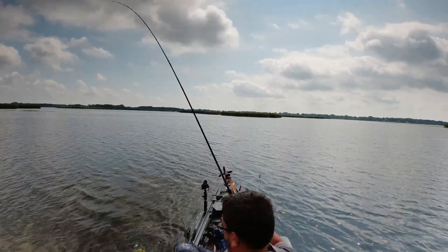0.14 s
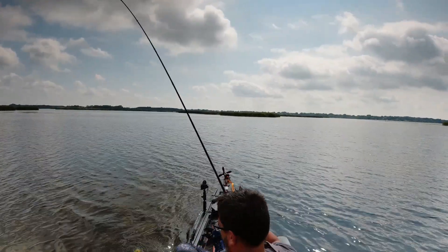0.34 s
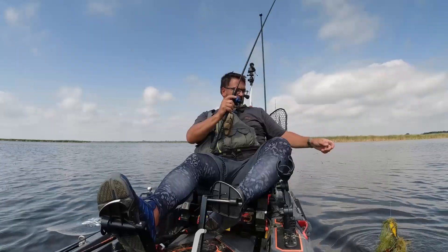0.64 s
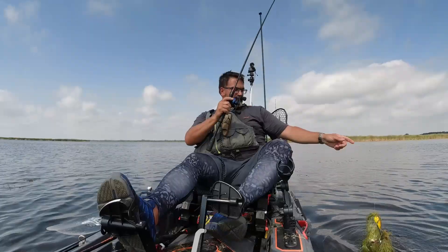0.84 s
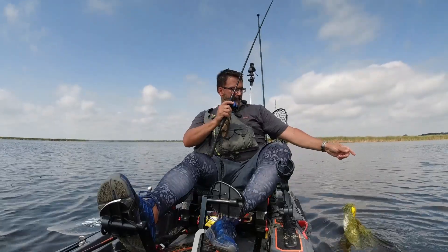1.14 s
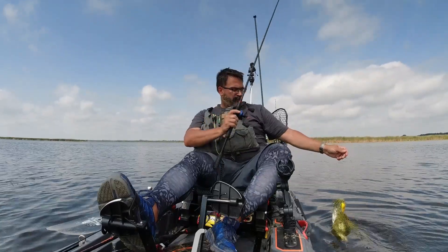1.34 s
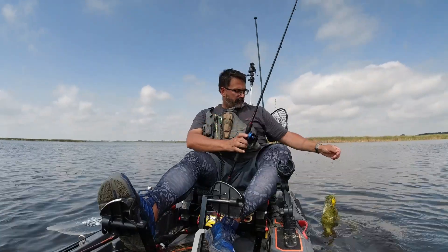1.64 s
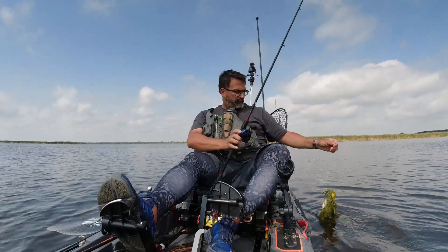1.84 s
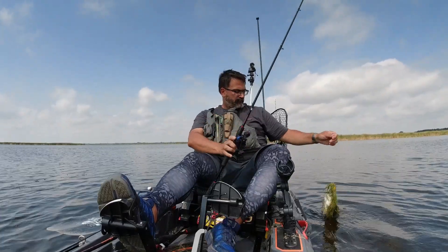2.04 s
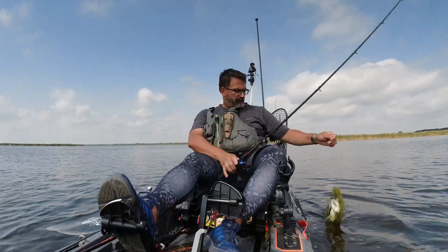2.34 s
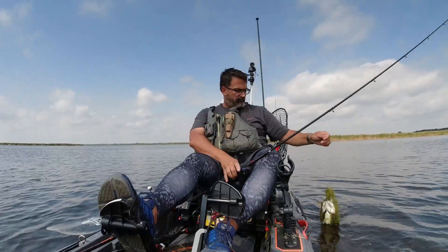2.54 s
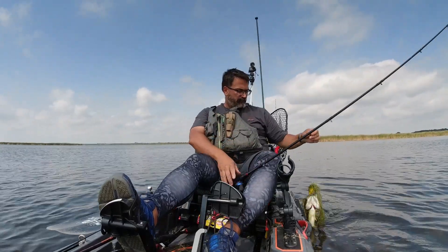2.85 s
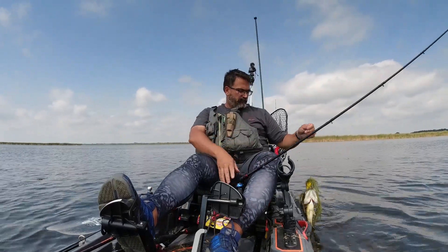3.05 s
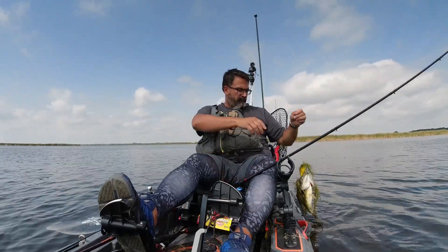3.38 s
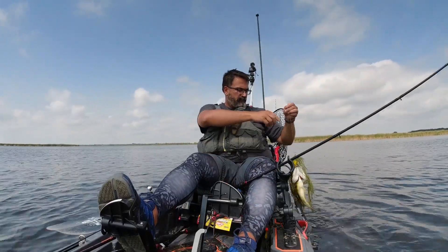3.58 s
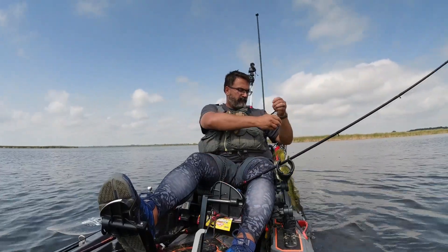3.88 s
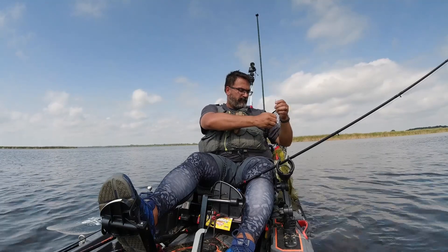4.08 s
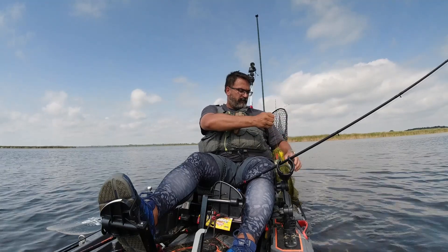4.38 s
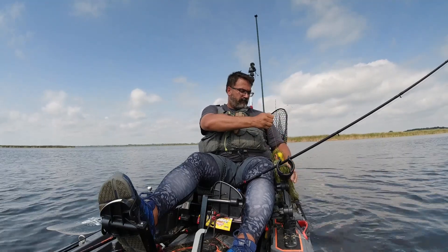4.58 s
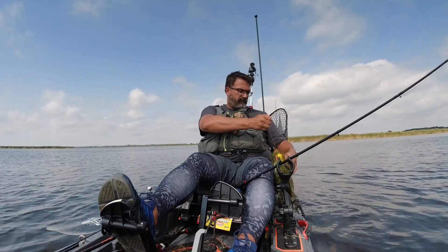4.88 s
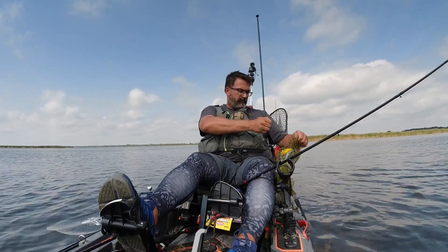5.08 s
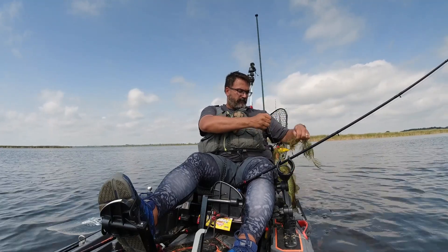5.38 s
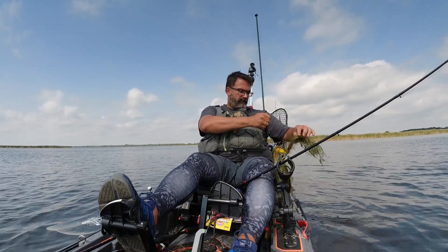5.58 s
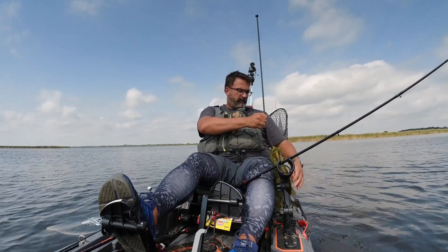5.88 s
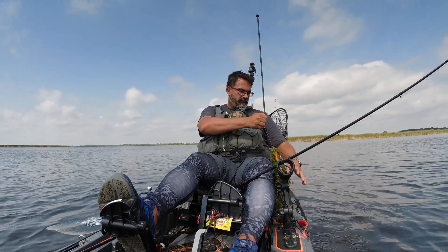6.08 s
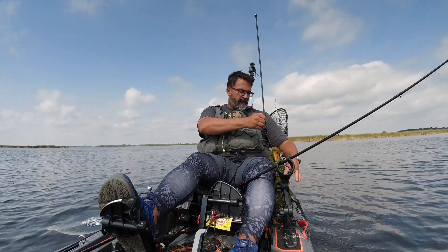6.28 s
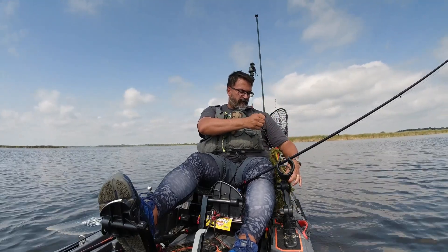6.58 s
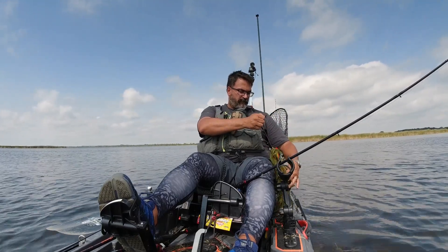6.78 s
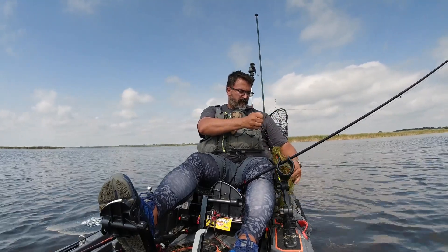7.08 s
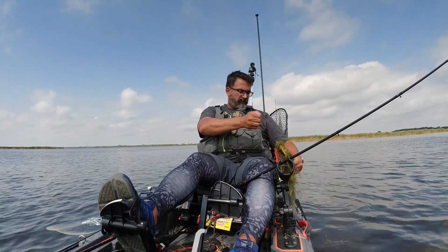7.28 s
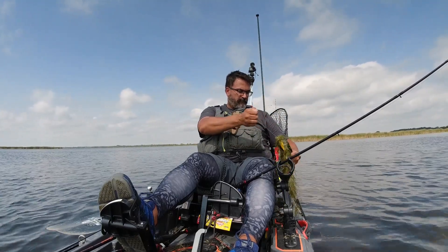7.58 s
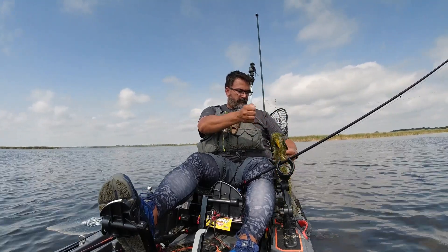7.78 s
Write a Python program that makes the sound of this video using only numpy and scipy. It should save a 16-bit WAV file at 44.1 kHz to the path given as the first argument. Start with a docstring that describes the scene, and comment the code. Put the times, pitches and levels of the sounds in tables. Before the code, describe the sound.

Feet and gear bump a hollow plastic kayak with dull, boomy knocks, while water gulps and wet rubber squeaks briefly. A very sharp plastic clack stands out early. More knocks, taps and cloth rustle follow, then the hull calms and crisp reel clicks come in small clusters. Close microphone mounted on the boat, outdoors on quiet open water, dry, with faint breeze and low hull drone.

```python
"""Hollow knocks come first: feet and rod strike a plastic kayak as an angler lifts a weedy fish.
The hull is a drum with ringing walls; tackle clacks and taps are short damped modes and noise bursts.
The reel ticks as its pawl snaps over teeth; clothing scuffs and sliding gear are modulated coloured noise.
Water gulps, drips and spits as short tones, with squeaks gliding in pitch.
The rocking boat shakes the mount in low swings, over a quiet lake breeze and a droning hull."""
import sys
import numpy as np
from scipy.fft import rfft, irfft, next_fast_len
from scipy.io import wavfile
from scipy.ndimage import map_coordinates

SR = 44100
rng = np.random.default_rng(int(sys.argv[2]) if len(sys.argv) > 2 else 0)


def wrap_up_sound(samples):
    """Save the sound to the file named by the first command line argument, as 16-bit audio."""
    columns = np.atleast_2d(samples).T
    # keep every value between -1 and 1, then stretch to whole-number steps
    tamed = np.clip(columns, -1, 1)
    steps = np.round(tamed * 32767).astype(np.int16)
    wavfile.write(sys.argv[1], SR, steps)


N = 349700
CLOCK = np.arange(N) / SR  # scene time, s
AGE = np.arange(SR // 2) / SR  # time since a blow, s
TOP_HZ = 16500  # band limit

# Light air over open water: pitch_hz, density_db (per Hz)
BREEZE_SPECTRUM = [(18, -38.5), (30, -7), (157, 9.5), (426, -12.5), (600, -22.5), (2980, -23.5),
                   (3980, -40), (6550, -51), (7270, -65), (9220, -52.5), (16000, -56)]
# Low swell beneath the air: pitch_hz, density_db (per Hz)
SWELL_SPECTRUM = [(10, -2.0), (28, 4.0), (45, -17.0), (90, -38.5), (300, -83.5)]
# Drone of the hollow hull: pitch_hz, density_db (per Hz)
DRONE_SPECTRUM = [(24, -39.5), (40, -1), (113, 4), (179, 1), (317, -10.5), (357, -9.5), (401, -17.5),
                  (750, -23), (900, -30.5), (1170, -51.5), (1980, -120)]

# The boat rocks, or lurches when a blow shoves it, and shakes the mount: middle_s, level_db, pitch_hz,
# half_length_s
LURCHES = [(0.157, -27, 17, 0.042), (0.235, -25, 40.7, 0.065), (0.448, -19.5, 9.1, 0.0073),
           (0.665, -31, 16.2, 0.12), (1.134, -37, 10.8, 0.066), (1.919, -33.5, 20, 0.11),
           (2.679, -31, 51, 0.11), (3.959, -24, 16, 0.026), (5.833, -36.5, 41, 0.032),
           (6.458, -27.5, 15.4, 0.025), (6.972, -18.5, 14.6, 0.036), (7.059, -25, 20.8, 0.093),
           (7.533, -20.5, 12.9, 0.031)]

# The angler shifts in the seat: start_s, end_s, rustle_db
SHIFTS = [(0, 0.17, -66.5), (0.694, 1.076, -64), (1.28, 1.916, -66.5), (2.351, 2.833, -59.5),
          (2.982, 3.723, -59)]
# Rustle of clothes: pitch_hz, density_db (per Hz)
CLOTH_SPECTRUM = [(150, 1.5), (350, 6), (700, 3.5), (1200, -1), (2700, -7.5), (4000, -13.5), (9500, -17),
                  (15000, -30)]
STILL_DB, SHIFT_RAMP_S = -67.5, 0.036  # rustle while still; time for a shift to start or stop
CRINKLE_DB, CRINKLES_PER_S = 4.5, 340  # grain of the cloth
FOLD_DB, FOLDS_PER_S = 2.5, 35  # unevenness from fold to fold
RUSTLE_SWAY_DB, SWAYS_PER_S = 1, 13  # slower sway of the rustle

# Shoes, sleeves and line slide over gear, and water along the hull:
# middle_s, length_s, level_db, centre_hz, width_octaves
RUBS = [(0.42, 0.082, -39, 388, 0.94), (0.539, 0.14, -50.5, 450, 1.28), (0.545, 0.26, -56, 5800, 1.2),
        (0.51, 0.11, -51.5, 5450, 0.28), (0.519, 0.11, -62, 4060, 0.078), (0.53, 0.11, -56.5, 12100, 0.26),
        (0.586, 0.05, -48, 6320, 0.63), (0.588, 0.054, -44.5, 466, 1.03), (0.676, 0.085, -47, 355, .6),
        (0.682, 0.16, -60, 9500, 6.9), (0.781, 0.029, -43.5, 794, 0.44), (0.921, 0.21, -69.5, 1200, 1.6),
        (1.225, 0.17, -57, 11500, 0.28), (1.227, 0.14, -61.5, 6500, 3.4), (1.941, 0.25, -43.5, 273, 1.26),
        (1.927, 0.13, -48, 1090, 0.2), (1.966, 0.2, -56, 2780, 0.17), (1.916, 0.22, -65, 5900, 0.64),
        (2.54, 0.25, -53.5, 550, 0.95), (3.53, 0.17, -50, 500, 0.7), (3.537, 0.11, -68.5, 1900, 0.56),
        (4.953, 0.22, -60.5, 11750, 2), (5.298, 0.34, -72.5, 9700, .3), (5.813, 0.11, -55, 12000, 2),
        (7.051, 0.21, -57, 333, 0.99), (7.334, .08, -61, 783, 0.64), (7.491, 0.39, -57.5, 341, 1.02),
        (7.525, 0.085, -69.5, 2500, 1.7)]
# Resonances of rod and reel: centre_hz, width_hz, level_db
GEAR_RESONANCES = [(1260, 39, -10.5), (2110, 200, 13), (2620, 200, 0.5), (3700, 890, 2.5),
                   (5240, 680, -8.5), (8090, 290, -7.5), (10500, 1900, -9)]
STROKE_PEAK = 0.67  # share of a stroke spent growing
SLIP_DB, SLIPS_PER_S = 1.5, 200  # coarse catches of the surfaces
GRIT_DB, GRITS_PER_S = 3.5, 900  # fine grit

# Wet rubber squeaks, mostly upward: start_s, length_s, level_db, from_hz, to_hz
SQUEAKS = [(0.464, 0.024, -42.5, 683, 1410), (0.485, 0.024, -41, 1175, 1110),
           (0.502, 0.027, -47, 1060, 1360), (0.485, 0.025, -51, 1460, 1720),
           (0.537, 0.0133, -50, 1460, 2380), (0.571, 0.013, -43, 870, 2080)]
SQUEAK_ROUGH = 0.07  # share by which the pitch wavers

# Wet grit and droplets spit: start_s, length_s, rms_db, centre_hz, scatter_octaves (half the extreme)
SPATTERS = [(0.473, 0.11, -58.5, 5180, 0.47), (0.569, 0.036, -55.5, 6500, 0.68),
            (.635, .11, -72.5, 8940, 0.22), (1.17, .12, -65.5, 10600, 0.23), (1.881, .17, -57, 1400, .5),
            (1.896, 0.069, -55, 2850, 0.51), (5.791, 0.042, -58, 8000, 0.71)]
SPITS_PER_S, SPIT_CYCLES, SPIT_SCATTER_DB = 370, 13, 5  # cycles until one has died; spread of strength

# Drops and small laps trap a bubble: start_s, level_db, bubble_hz, t60_s
DROPS = [(.247, -34.5, 2260, 0.037), (4.31, -39.5, 680, 0.017), (4.5489, -39, 657, 0.024),
         (4.655, -51, 680, .025), (6.266, -47.5, 660, 0.017)]
# Water under the hull squeezes an air pocket:
# start_s, peak_db, pitch_hz, glide_octaves_per_s, t60_s
GULPS = [(.111, -27, 534, -4.5, 0.18), (.115, -29, 289, 7, 0.055), (.181, -23, 331, 0.5, 0.066),
         (1.818, -33, 1266, -5.5, 0.031), (1.857, -45, 785, 0, 0.024), (1.971, -34.5, 810, 1.5, 0.062),
         (2.223, -41, 770, 3, 0.12), (2.812, -27, 357, 4.5, 0.16), (2.829, -38, 975, -3, 0.058),
         (3.466, -40, 835, -4.5, 0.14), (3.478, -43.5, 601, 6.5, 0.19), (5.803, -32.5, 779, 1, 0.052),
         (5.804, -36.5, 316, 4, 0.061)]
GULP_ATTACK_S, GULP_ROUGH = 0.0023, 0.13  # time to swell; share by which the pitch wavers

# The reel clicks as the rod moves or line is tugged: start_s, level_db, strongest_hz
TICKS = [(0.2263, -53.5, 6200), (0.3009, -52, 5830), (0.4224, -43, 6700), (0.436, -44.5, 7300),
         (0.5781, -32.5, 6530), (0.587, -41, 5620), (.596, -34.5, 7460), (0.608, -34, 8980),
         (0.6608, -45, 9100), (.6738, -39.5, 9690), (1.259, -51, 11700), (1.865, -48.5, 7200),
         (2.4082, -46.5, 10200), (2.608, -49.5, 5400), (2.662, -52.5, 6300), (3.189, -35.5, 5830),
         (3.331, -54.5, 7600), (3.4653, -27.5, 8540), (3.652, -44.5, 10500), (3.9218, -33.5, 6040),
         (4.153, -35, 8900), (4.3202, -42, 4960), (4.56, -43.5, 4760), (4.928, -25.5, 6900),
         (4.932, -33, 9500), (4.9435, -32.5, 9800), (4.95, -34.5, 8500), (4.963, -31.5, 8000),
         (4.9716, -22, 8100), (4.9865, -41, 8850), (4.993, -35, 10260), (5.0134, -40.5, 7000),
         (5.0303, -22.5, 7400), (5.2518, -34.5, 7180), (5.255, -38.5, 8500), (5.4676, -28.5, 6500),
         (5.6302, -34, 6950), (5.638, -40.5, 8020), (5.646, -31.5, 6460), (5.6762, -35.5, 5880),
         (5.687, -39, 5970), (5.8322, -29.5, 11190), (5.852, -55, 11000), (6.6361, -50, 5030),
         (7.519, -53, 6130), (7.8818, -45, 5970)]
# The spool slips and the pawl chatters: start_s, length_s, first_level_db, strongest_hz, fade_db (over the run)
RUNS = [(1.572, 0.055, -43, 9200, 16), (3.196, 0.13, -49, 9100, 22), (3.937, 0.12, -55, 9300, 7),
        (4.338, 0.077, -48.5, 6200, 18), (4.603, 0.018, -51.5, 5000, 2), (4.888, 0.03, -45.5, 11700, 9.5),
        (4.997, 0.032, -53, 11000, 1), (5.109, 0.027, -50, 5460, 13), (5.256, 0.11, -51, 8500, 12),
        (5.66, 0.011, -42, 6670, 3), (5.695, 0.02, -42, 5800, 12), (7.7078, 0.052, -43.5, 5700, 12.5),
        (7.8995, 0.03, -40.5, 5900, 3)]
# Modes of the pawl spring: pitch_hz, level_db, t60_s
PAWL_MODES = [(3347, -28, 0.00632), (5240, -4.5, 0.007), (5540, 1.5, 0.022), (6586, -13, 0.0045),
              (7800, -1, 0.021), (7610, -4, 0.0081), (8940, -13, 0.004), (10100, -1, 0.018),
              (10600, -11, 0.0069), (13100, -22, 0.0035)]
# Top octave of a click, and its housing: pitch_hz, density_db (per Hz)
PAWL_SNAP_SPECTRUM = [(6000, -23.5), (11000, -2.5), (13000, -6), (15500, -17.5), (17000, -40)]
HOUSING_SPECTRUM = [(500, 1.5), (2500, 6), (4400, 6.0), (5700, 6), (6700, 9.0), (8000, 4.0),
                    (10500, 2.5), (13000, -19.0)]
PAWL_PER_S, PAWL_JITTER, PAWL_SCATTER_DB = 190, 0.19, 3  # click rate; scatter of spacing (share) and level
PAWL_DETUNE, PAWL_TAIL_DB = 0.045, -12  # pitch scatter (share); ring left after the first snap
SNAP_DB, SNAP_HZ, SNAP_DB_PER_OCTAVE = -38.5, 5660, 42  # base of the snap level, its pitch, growth above it

# Rod and tackle tap against the boat: start_s, level_db, ring_hz, deck_db (re the tap)
TAPS = [(0.0796, -38.5, 1780, -10), (0.104, -33, 3480, -26), (.111, -28, 1540, -21), (.186, -31, 2500, -16),
        (.3872, -41, 1900, -10), (.4716, -37, 2730, -22), (1.701, -25.5, 2970, -26),
        (1.7815, -35.5, 2700, -18.5), (1.914, -47, 2060, -16), (1.931, -33.5, 2530, -11),
        (1.943, -41, 2880, -14), (2.0677, -38.5, 1750, -20), (2.1277, -24.5, 2050, -31.5),
        (2.4082, -24.5, 2230, -22.5), (2.7998, -34.5, 1600, -10), (2.8169, -26.5, 2570, -15.5),
        (3.1087, -28.5, 5140, -33), (3.464, -24, 2200, -18), (3.468, -23.5, 2500, -15.5),
        (3.708, -28.5, 2620, -20), (3.906, -26.5, 2690, -19), (4.32, -43.5, 3030, -28),
        (4.5598, -41, 3840, -21.5), (5.8025, -35.5, 4070, -16), (5.8327, -25.5, 2090, -18.5)]
# Crack, bright edge and deck answer of a tap: pitch_hz, density_db (per Hz)
TAP_CRACK_SPECTRUM = [(300, -6), (700, 6.5), (1400, -15), (2200, 4.5), (4500, 0), (6200, -16.5),
                      (10000, -87), (16000, -44)]
TAP_EDGE_SPECTRUM = [(3000, -27), (6500, 18), (10500, 5), (15000, -15.5)]
TAP_DECK_SPECTRUM = [(250, 11.0), (700, 5.5), (2500, -3.0), (5000, -10.5), (10000, -19.5), (14000, -38)]
TAP_EDGE_DB = -21.5  # re the tap

# A hard plastic fitting snaps: start_s, level_db
CLACKS = [(0.542, -33.5), (0.578, -36.5), (0.6273, -10.5), (0.6353, -34), (0.7334, -31.5), (0.8536, -43.5),
          (1.01, -52), (1.3344, -48), (3.6527, -33), (3.6623, -35.5), (5.6053, -36.5), (5.612, -42.5)]
# Modes of the fitting: pitch_hz, level_db, t60_s
FITTING_MODES = [(1170, -22, 0.021), (1807, 3, 0.011), (2100, -4.5, 0.01), (2306, -15, .02),
                 (2660, -20, 0.022), (4170, -23, .009), (5300, -30.5, 0.0045), (5900, -26.5, .007)]
# Snap and deck answer of a clack: pitch_hz, density_db (per Hz)
CLACK_SNAP_SPECTRUM = [(500, -11.5), (2000, 8.5), (6000, -11.5), (11000, -6), (16000, -28)]
CLACK_DECK_SPECTRUM = [(300, -1.0), (900, 2.0), (2800, 2.5), (4000, -6.0), (12000, -24.0)]

# Feet and rod butt strike the hull, then settle: start_s, strength_db, hardness (0-1), drum_hz,
# drum_t60_s, settle_s, wall_db (re the strength), strongest_wall_hz
KNOCKS = [(0.11, -29, 0.74, 150, 0.091, 0.0091, 10, 426), (0.1799, -31, 0.73, 110.7, 0.19, .026, 11.5, 275),
          (0.24, -36.5, 0.4, 108.4, 0.62, .035, -15, 190),
          (0.3858, -36.5, 0.97, 90.3, 0.37, .01, 14.5, 425),
          (0.45, -37.5, 0.88, 118.7, 0.47, 0.022, 7, 830), (.646, -32, 0.48, 112.6, 0.5, .03, 1, 252),
          (0.95, -44, 0.5, 119.3, 0.28, .019, -19, 190),
          (1.8169, -32, 0.73, 122.4, 0.26, 0.0091, 13.5, 247),
          (1.8567, -33.5, 0.66, 120, 0.29, 0.012, 7, 475), (1.931, -44, 0.4, 119.6, 0.18, 0.01, 12, 680),
          (1.9701, -32, 0.5, 117, 0.22, 0.0054, 10.5, 250), (2.021, -34.5, 0.64, 122, 0.64, 0.02, 11, 215),
          (2.057, -42, 0.79, 121, 0.18, 0.016, 7.5, 210), (2.129, -44, 0.88, 128.5, 0.43, 0.013, 9, 564),
          (2.2221, -23, 0.48, 115.7, 0.21, 0.042, -3.5, 216), (2.37, -37, 0.1, 135.4, 0.6, .019, 1.5, 220),
          (2.593, -28, 0.5, 110.5, 0.1, 0.028, -10.5, 200), (2.667, -46, 0.76, 110, 0.25, 0.022, 4, 503),
          (2.8114, -25.5, 0.65, 147, 0.078, 0.0065, 7.5, 230),
          (2.879, -32.5, 0.4, 122, 0.24, 0.0168, -8, 190), (3.185, -49, 0.8, 117.5, 0.21, 0.053, 2, 345),
          (3.4658, -51, 1, 119.7, 0.63, 0.0033, -6, 900), (3.468, -29.5, 0.1, 101.7, 0.56, .043, -20, 190),
          (3.492, -27.5, .05, 123.2, 0.19, 0.062, -23, 190), (3.923, -37.5, 0, 150.8, 0.22, .02, -4.5, 190),
          (5.602, -54, 1, 118, 0.1, 0.0067, 14.5, 1100),
          (5.8026, -46, 0.95, 113.5, 0.19, 0.0074, 12.5, 435)]
# Drum modes of the hull: pitch_ratio, level_db, t60_share (of the drum's)
HULL_MODES = [(.81, -7.5, 0.3), (1, 10.5, 1), (1.35, -3, 0.89), (1.73, -13, 0.92)]
# Modes of the hull walls: pitch_hz, level_db, t60_s
WALL_MODES = [(169, -4.5, 0.51), (201.1, 10.5, 0.1), (253, -5.5, 0.41), (299, -2.5, 0.2), (340, -6, 0.29),
              (386.4, 2.5, 0.14), (434, -4, 0.11), (498, 2.5, 0.068), (598, -5, .07), (686, -1.5, .08),
              (820, 1.5, 0.045), (926.6, -3.5, 0.063), (1090, -13, .06), (1409, -13.5, 0.094)]
# Noise at the point of contact, and rattle of the walls: pitch_hz, density_db (per Hz)
CONTACT_SPECTRUM = [(400, -32), (800, 6), (1350, 10), (1900, -3), (3000, -7.5), (5000, -23.5),
                    (9000, -26.5), (15000, -62.5)]
RATTLE_SPECTRUM = [(120, -13.0), (250, 6.5), (520, -0.5), (900, -11.0), (2000, -35.5), (5000, -65.5)]
SETTLE_DB, SETTLE_HARDNESS = -4.5, 0.52  # settling thump re the first blow; its share of the hardness
WALL_SOFT_HZ, WALL_SETTLE_DB = 207.7, -4  # strongest wall pitch in the thump; change of wall level there
WALL_FOCUS_DB = 9  # fall per octave away from the strongest wall pitch
CONTACT_SOFT_DB, CONTACT_HARD_DB, CONTACT_TAIL_DB = -50.5, 9, -13  # re the strength; tail re the contact
SHOVE_DB, SHOVE_HZ, SHOVE_LAG_S, SHOVE_HALF_S = -9.5, 45.3, 0.059, 0.029  # each knock shoves the boat


def amp(db):
    """Level in decibels converts to a linear gain."""
    return 10 ** (np.asarray(db) / 20)


def unit(x):
    """Normalization to an rms of 1."""
    return x / np.sqrt(np.mean(x ** 2) + 1e-20)


def crest(x):
    """Normalization to a peak of 1."""
    return x / np.max(np.abs(x))


def add(track, s, sound):
    """Superposition: mix a sound into the track at time s, cropped at both ends."""
    start = round(s * SR)
    sound = sound[max(-start, 0):]
    room = track[max(start, 0):][:len(sound)]
    room += sound[:len(room)]


def noise(spectrum, size):
    """Spectral shaping: white noise is filtered through (Hz, dB) points and set to rms 1."""
    hz, db = np.transpose(spectrum)
    m = next_fast_len(size)
    log_hz = np.log(np.fft.rfftfreq(m, 1 / SR) + 1)
    gain = amp(np.interp(log_hz, np.log(hz), db))
    gain[0] = 0
    return unit(irfft(rfft(rng.standard_normal(m)) * gain, m)[:size])


def wobble(rate):
    """Slow random modulation: a smooth curve through random knots, rate of them a second."""
    return map_coordinates(rng.standard_normal(4096), [CLOCK * rate], mode="wrap")


def fade(t60):
    """Exponential damping: a fall of 60 dB in t60 seconds."""
    return np.exp(-np.log(1000) * AGE / t60)


def rise(attack):
    """Finite contact time: the force builds up exponentially."""
    return 1 - np.exp(-AGE / attack)


def ring(modes, pitch=1):
    """Modal superposition: damped sines of joint peak 1, weighed anew by each blow's place."""
    out = 0
    for k, (hz, db, t60) in enumerate(modes):
        more_db, detune = rng.normal(0, 2), rng.normal(0, 0.007)
        tone = np.sin(2 * np.pi * pitch * hz * (1 + detune) * AGE)
        out = out + (-1) ** k * amp(db + more_db) * fade(t60) * tone
    return crest(out)


def breeze():
    """Broadband turbulence: steady air and swell, while ripples keep the hollow hull droning."""
    air = amp(-62.0) * noise(BREEZE_SPECTRUM, N)
    swell = amp(-62.5) * noise(SWELL_SPECTRUM, N)
    drone = amp(-54 + 0.8 * wobble(6.8)) * noise(DRONE_SPECTRUM, N)
    return air + swell + drone


def swing(hz, half):
    """Inertia of a heavy body: a low oscillation with judder, swelling and dying about its middle."""
    t = AGE - AGE[-1] / 2
    judder = noise([(hz / 4, -18), (hz / 2, 0), (hz * 2, -2), (hz * 3.7, -16), (hz * 10, -42), (hz * 30, -90)],
                   len(t))
    sway = np.cos(2 * np.pi * hz * t + rng.uniform(0, 2 * np.pi))
    return (sway + amp(-1.5) * judder) * np.exp(-(t / half) ** 2)


def lurches():
    """Rigid-body motion: the boat rocks as the angler leans or lurches when a blow shoves it, giving brief low
    swings."""
    out = np.zeros(N)
    for middle, db, hz, half in LURCHES:
        add(out, middle - AGE[-1] / 2, amp(db) * swing(hz, half))
    return out


def click(centre_hz):
    """Snap-through: the pawl drops over a tooth; spring and housing ring most near one pitch."""
    size = SR // 20
    top_db = SNAP_DB + SNAP_DB_PER_OCTAVE * np.log2(centre_hz / SNAP_HZ)
    lean = lambda hz: -8 * abs(np.log2(hz / centre_hz))
    leaning_modes = [(hz, db + lean(hz), t60) for hz, db, t60 in PAWL_MODES]
    spring = ring(leaning_modes, 1 + PAWL_DETUNE * rng.standard_normal())[:size]
    spring = crest(spring * (np.exp(-AGE[:size] / 0.0003) + amp(PAWL_TAIL_DB)))
    snap = noise(PAWL_SNAP_SPECTRUM, size) * fade(0.013)[:size]
    buzz = (fade(0.012) + amp(-26) * fade(0.05))[:size]
    housing = noise([(hz, db + lean(hz)) for hz, db in HOUSING_SPECTRUM], size) * buzz
    return spring + amp(top_db - 2.5) * snap + amp(-8.5) * housing


def handling():
    """Friction of cloth: noise crinkles fold by fold in each shift; buckles and zips tick now and then."""
    moving = np.zeros(N)
    for start, end, db in SHIFTS:
        corners = [start - SHIFT_RAMP_S, start, end, end + SHIFT_RAMP_S]
        moving += amp(db) * np.interp(CLOCK, corners, [0, 1, 1, 0])
    crinkle_db = CRINKLE_DB * wobble(CRINKLES_PER_S)
    fold_db = FOLD_DB * wobble(FOLDS_PER_S)
    sway_db = RUSTLE_SWAY_DB * wobble(SWAYS_PER_S)
    rustle = unit(noise(CLOTH_SPECTRUM, N) * amp(crinkle_db + fold_db + sway_db))
    out = moving * rustle + amp(STILL_DB) * noise(CLOTH_SPECTRUM, N)
    for s, hz, force in rng.uniform([0, 4500, 0], [3.8, 7500, 1], size=(28, 3)):
        add(out, s, moving[int(s * SR)] * amp(3 * force) * click(hz))
    return out


def rubs():
    """Sliding friction: surfaces catch in tiny slips that excite the resonances of the gear."""
    out = np.zeros(N)
    hz = np.geomspace(20, 17000, 300)
    body = 0.31
    for centre, width, db in GEAR_RESONANCES:
        body = body + amp(db) / (1 + (2 * (hz - centre) / width) ** 2)
    slips = amp(SLIP_DB * wobble(SLIPS_PER_S) + GRIT_DB * wobble(GRITS_PER_S))
    for middle, length, db, centre_hz, octaves in RUBS:
        start, size = middle - length / 2, round(length * SR)
        fall_db = np.minimum(7.7 * (np.log2(hz / centre_hz) / octaves) ** 2, 60)
        colour = 20 * np.log10(body) - fall_db
        quarter_turns = np.interp(np.linspace(0, 1, size), [0, STROKE_PEAK, 1], [0, 1, 2])
        stroke = np.sin(np.pi / 2 * quarter_turns)
        hiss = noise(np.c_[hz, colour], SR)[:size]
        add(out, start, amp(db) * stroke * unit(hiss * slips[round(start * SR):][:size]))
    return out


def squeaks():
    """Stick-slip oscillation: a wavering tone and its octave glide as wet surfaces slide."""
    out = np.zeros(N)
    for s, length, db, from_hz, to_hz in SQUEAKS:
        hz = np.geomspace(from_hz, to_hz, round(length * SR))
        waver = 1 + SQUEAK_ROUGH * wobble(600)[:len(hz)]
        phase = 2 * np.pi * np.cumsum(hz * waver) / SR
        tone = np.sin(phase) + 0.14 * np.sin(2 * phase)
        add(out, s, amp(db) * np.sqrt(np.hanning(len(hz))) * tone)
    return out


def spatters():
    """Granular superposition: clouds of tiny bursts, each with its own moment, pitch and strength."""
    out = np.zeros(N)
    t = AGE[:SR // 100]
    for start, length, db, centre_hz, octaves in SPATTERS:
        cloud = np.zeros(round(length * SR) + len(t))
        count = max(round(length * SPITS_PER_S), 1)
        for k, (late, higher, louder) in enumerate(rng.uniform(-1, 1, (100, 3))[:count]):
            hz = min(centre_hz * 2 ** (2 * octaves * higher), TOP_HZ * 0.8)
            decay = np.exp(-np.log(1000) * hz * t / SPIT_CYCLES)
            spit = np.sin(2 * np.pi * hz * t) * (1 - np.exp(-hz * t)) * decay
            add(cloud, abs(k + late) / SPITS_PER_S, amp(SPIT_SCATTER_DB * louder) * spit)
        add(out, start, amp(db) * unit(cloud))
    return out


def drops():
    """Bubble resonance: a drop splats and the bubble it traps rings briefly."""
    out = np.zeros(N)
    for s, db, hz, t60 in DROPS:
        splat = noise([(hz / 4, -20), (hz, 0), (hz * 2, -8), (hz * 8, -40)], len(AGE)) * fade(0.011)
        bubble = np.sin(2 * np.pi * hz * AGE) * fade(t60)
        add(out, s, amp(db) * (bubble + 0.5 * splat) * rise(0.00024))
    return out


def gulps():
    """Cavity resonance: the hull slaps water; trapped air glides in pitch as its pocket swells or shrinks."""
    out = np.zeros(N)
    for s, db, hz, glide, t60 in GULPS:
        waver = 1 + GULP_ROUGH * wobble(300)[:len(AGE)]
        pitch = hz * 2 ** (glide * AGE) * waver
        tone = np.sin(2 * np.pi * np.cumsum(pitch) / SR)
        add(out, s, amp(db) * crest(tone * rise(GULP_ATTACK_S) * fade(t60)))
    return out


def ticks():
    """Ratchet excitation: single clicks as line is tugged, and uneven runs that fade as the spool slips."""
    out = np.zeros(N)
    for s, db, hz in TICKS:
        add(out, s, amp(db) * click(hz))
    for start, length, db, hz, fade_db in RUNS:
        for k, (late, louder) in enumerate(rng.standard_normal((30, 2))):
            age = k / PAWL_PER_S
            if age < length:
                late_s = min(k, 1) * late * PAWL_JITTER / PAWL_PER_S  # the first click is on time
                click_db = db + PAWL_SCATTER_DB * louder - fade_db * age / length
                add(out, start + age + late_s, amp(click_db) * click(hz))
    return out


def taps():
    """Light impact: a crack, a short ring of the part hit, a bright edge and the deck's dull answer."""
    out = np.zeros(N)
    for s, db, hz, deck_db in TAPS:
        crack = amp(-11.0) * noise(TAP_CRACK_SPECTRUM, len(AGE)) * fade(0.022)
        tone = amp(-1.0) * np.sin(2 * np.pi * hz * AGE) * fade(0.007)
        edge = amp(TAP_EDGE_DB) * noise(TAP_EDGE_SPECTRUM, len(AGE)) * fade(0.0039)
        deck = amp(deck_db) * noise(TAP_DECK_SPECTRUM, len(AGE)) * fade(0.14)
        add(out, s + 0.0005, amp(db) * rise(0.00011) * (crack + tone + edge + deck))
    return out


def clacks():
    """Stiff impact: the fitting snaps, its damped modes ring and the deck answers faintly."""
    out = np.zeros(N)
    for s, db in CLACKS:
        snap = amp(-14.0) * noise(CLACK_SNAP_SPECTRUM, len(AGE)) * fade(0.0096)
        deck = amp(-14.5) * noise(CLACK_DECK_SPECTRUM, len(AGE)) * fade(0.032)
        add(out, s + 0.00019, amp(db) * rise(0.0001) * (ring(FITTING_MODES) + snap + deck))
    return out


def blow(hardness, drum_hz, drum_t60, wall_db, wall_hz):
    """Modal excitation: hull drums, walls ring by the spot struck; a harder blow adds contact noise."""
    contact_db = CONTACT_SOFT_DB + hardness * (CONTACT_HARD_DB - CONTACT_SOFT_DB)
    drum_modes = [(ratio, db, share * drum_t60) for ratio, db, share in HULL_MODES]
    drum = ring(drum_modes, drum_hz) * rise(0.0016)
    wall = ring([(hz, db - WALL_FOCUS_DB * abs(np.log2(hz / wall_hz)), t60) for hz, db, t60 in WALL_MODES])
    rattle = noise(RATTLE_SPECTRUM, len(AGE)) * rise(0.00098) * fade(0.11)
    contact_fade = fade(0.042) + amp(CONTACT_TAIL_DB) * fade(0.12)
    contact = noise(CONTACT_SPECTRUM, len(AGE)) * rise(0.00031) * contact_fade
    return amp(6.5) * drum + amp(wall_db) * (wall + amp(-11.0) * rattle) + amp(contact_db) * contact


def knocks():
    """Impact and recoil: each blow lands, settles with a softer thump and shoves the boat."""
    out = np.zeros(N)
    for s, db, hardness, drum_hz, t60, settle, wall_db, wall_hz in KNOCKS:
        landing = blow(hardness, drum_hz, t60, wall_db, wall_hz)
        thump = blow(hardness * SETTLE_HARDNESS, drum_hz, t60, wall_db + WALL_SETTLE_DB, WALL_SOFT_HZ)
        shove = swing(SHOVE_HZ, SHOVE_HALF_S)
        add(out, s, amp(db) * landing)
        add(out, s + settle, amp(db + SETTLE_DB) * thump)
        add(out, s + SHOVE_LAG_S - AGE[-1] / 2, amp(db + SHOVE_DB) * shove)
    return out


def scene():
    """Superposition in the open: all sources add directly, with no reverberation."""
    background = breeze() + lurches() + handling()
    sliding = rubs() + squeaks()
    water = spatters() + drops() + gulps()
    tackle = ticks() + taps() + clacks()
    return (background + sliding + water + tackle + knocks())[None]


def record(dry):
    """Band limitation: nothing above the limit passes."""
    m = next_fast_len(N + 8192)
    passed = np.fft.rfftfreq(m, 1 / SR) < TOP_HZ
    return irfft(rfft(dry, m) * passed, m)[..., :N]


dry = scene()
out = record(dry)
wrap_up_sound(out)
```